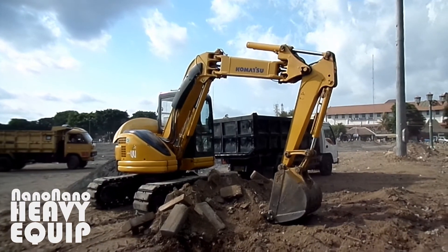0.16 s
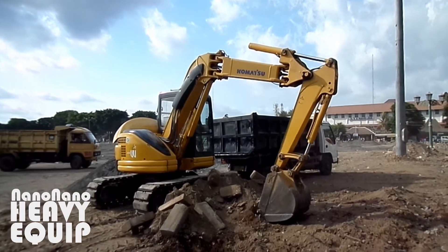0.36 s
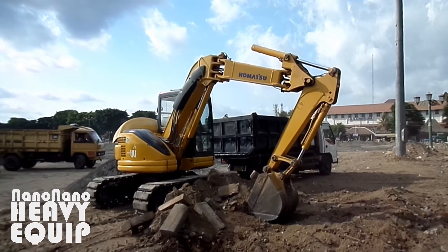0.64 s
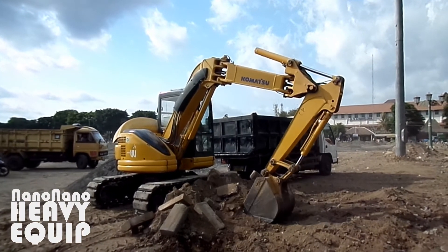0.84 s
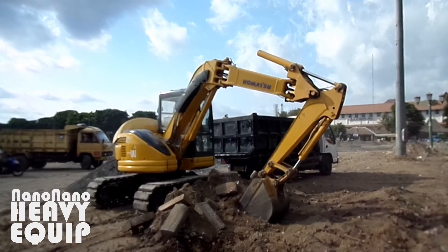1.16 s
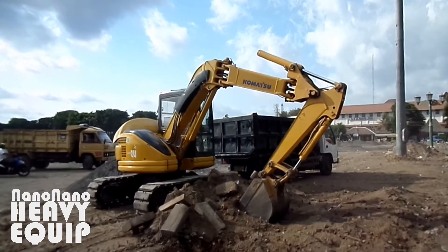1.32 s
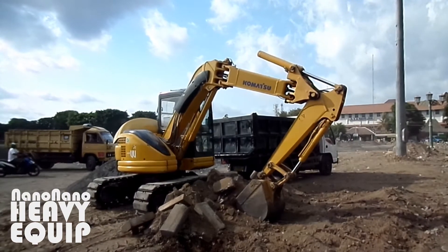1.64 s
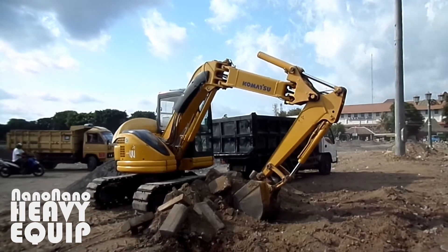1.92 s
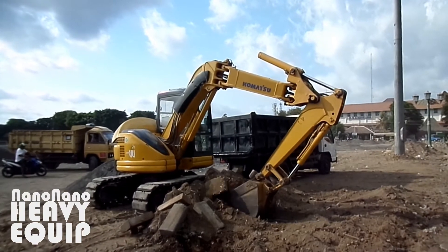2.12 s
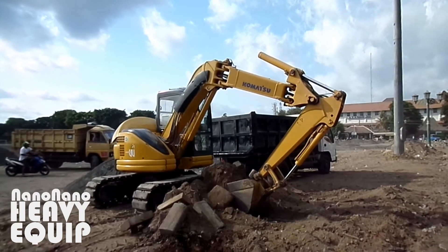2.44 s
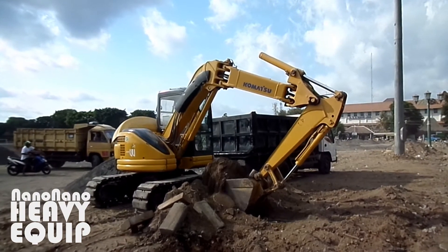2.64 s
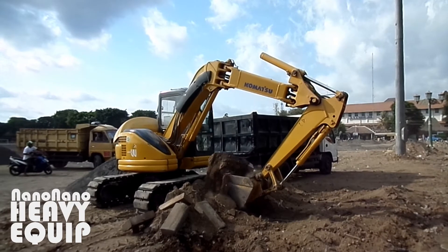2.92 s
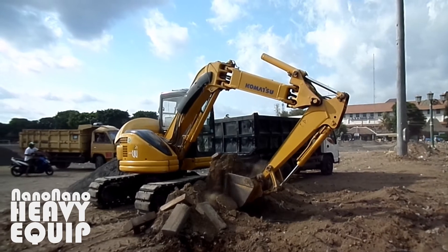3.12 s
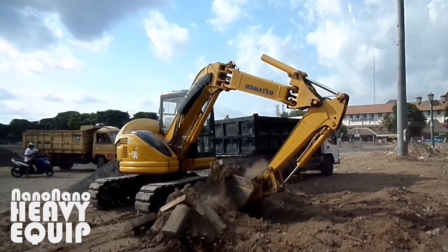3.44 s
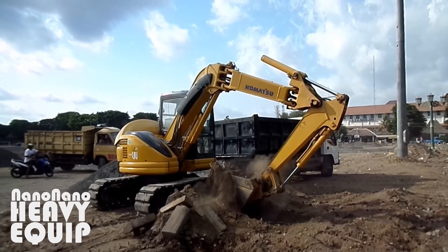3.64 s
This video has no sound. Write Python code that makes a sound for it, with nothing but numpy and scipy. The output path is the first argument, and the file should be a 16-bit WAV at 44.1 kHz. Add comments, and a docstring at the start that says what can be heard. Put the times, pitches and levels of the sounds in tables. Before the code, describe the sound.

Diesel excavator rumbling and whining as it digs through soil and stones in buffeting wind

```python
"""Excavator digging on an open site

A diesel excavator drags its bucket through soil and rubble, all heard at one microphone.
The engine's exhaust and the hydraulic pump are sums of tones tied to one shaft; clatter and oil are noise.
Soil and rubble are showers of clicks and ringing pebbles; stones knock and squeal on the steel bucket.
Wind buffets the microphone with filtered clicks, short low thumps and two sharp overload ticks."""
import sys
import numpy as np
from scipy import signal
from scipy.fft import rfft, irfft
from scipy.io import wavfile

SR = 44100
rng = np.random.default_rng(int(sys.argv[2]) if len(sys.argv) > 2 else 0)


def output_pcm(signal):
    """Save a mono or channel-first signal as 16-bit PCM at the path in sys.argv[1].

    Samples are clipped to [-1, 1] before scaling.
    """
    pcm = np.clip(np.atleast_2d(signal).T, -1, 1) * 32767
    wavfile.write(sys.argv[1], SR, np.round(pcm).astype(np.int16))


N = 166257
T = np.arange(N) / SR


def amp(db):
    """Decibels to gain."""
    return 10 ** (np.asarray(db) / 20)


def unit(x):
    """Scales to rms 1."""
    return x / np.sqrt(np.mean(x ** 2) + 1e-20)


def curve(rows, axis=1):
    """One column of a table, joined by straight lines over time."""
    rows = np.array(rows)
    return np.interp(T, rows[:, 0], rows[:, axis])


def add(mix, start, sound):
    """Mixes a sound in at a time in seconds."""
    part = mix[max(round(start * SR), 0):][:len(sound)]
    part += sound[:len(part)]


def colour(x, points):
    """Filters by a spectrum drawn over log frequency, to rms 1."""
    hz, db = np.transpose(points)
    f = np.fft.rfftfreq(len(x), 1 / SR)
    gain = amp(np.interp(np.log(f + 1), np.log(hz), db))
    return unit(irfft(rfft(x) * gain, len(x)))


def drift(hz):
    """Random wander that fades out above a rate in Hz, rms 1."""
    f = np.fft.rfftfreq(N, 1 / SR)
    lowpass = np.exp(-(f / hz) ** 2) * (f > 0)
    return unit(irfft(rfft(rng.standard_normal(N)) * lowpass, N))


def grains(per_s, spread_db):
    """Random clicks of uneven size and either sign."""
    size = amp(spread_db * np.minimum(rng.exponential(1, N), np.pi))
    return size * rng.choice([-1, 1], N) * (rng.random(N) < per_s / SR)


def swell(start, peak, end):
    """Rises smoothly to a peak and falls away."""
    return np.sin(np.pi / 2 * np.interp(T, [start, peak, end], [0, 1, 0])) ** 2


# Engine speed before its wobble: (time [s], shaft speed [turns/s])
ENGINE_SPEED = [(0, 30.0), (.4, 29.7), (.75, 29.9), (1.1, 30.45), (2.15, 30.68), (2.6, 30.45), (3.0, 30.55),
                (3.3, 30.8), (3.55, 30.55), (3.72, 29.95)]
# Exhaust tones, before the exhaust level: (multiple of firing rate, level [dB])
EXHAUST_TONES = [(1, -48), (2, -38.5), (3, -37.5), (4, -46), (5, -45.5), (6, -49.5), (7, -48)]
# Exhaust level: (time [s], level [dB])
EXHAUST_LEVEL = [(0, 4.5), (.7, -1.5), (1.1, -2.5), (2.2, -1.5), (2.7, -1.5), (3.77, -2)]
# Pump whine: (time [s], first harmonic [dB], second harmonic [dB], third harmonic [dB])
PUMP_WHINE = [(0, -28, -44, -37.5), (.68, -27, -44, -37.5), (.9, -38, -49, -45.5), (1.4, -41.5, -52, -53.5),
              (1.9, -36, -47.5, -42), (2.3, -67, -45.5, -45.5), (2.8, -48, -46.5, -50.5),
              (3.4, -41, -53, -46.5), (3.77, -55, -45, -36.5)]
# High pump tones: (multiple of piston rate, level against the third harmonic [dB])
PUMP_HIGH_TONES = [(7, -17)]
# Spectrum of the engine clatter: (frequency [Hz], relative density [dB per Hz])
CLATTER_SPECTRUM = [(20, -28), (55, -3.5), (130, 1.5), (280, 0), (480, -14), (700, -3), (900, -12),
                    (1050, -13.5), (1880, -14.5), (2250, -21.5), (4000, -30), (8000, -51), (16000, -70)]
# Clatter level: (time [s], level [dB])
CLATTER_LEVEL = [(0, -31), (.7, -30.5), (.9, -35.5), (1.3, -39.5), (1.7, -32.5), (2.05, -34), (2.8, -33.5),
                 (3.3, -29.5), (3.52, -39.5), (3.77, -32)]
CYLINDERS, PISTONS = 4, 9  # engine cylinders, pump pistons
SPEED_WOBBLE, CLATTER_DEPTH = .002, .25  # fractions of speed and of noise amplitude


def machine():
    """One shaft drives exhaust tones, pump whine and noise that swells at each firing."""
    turns = np.cumsum(curve(ENGINE_SPEED) * (1 + SPEED_WOBBLE * drift(33.0))) / SR
    firing = turns * CYLINDERS / 2  # each cylinder fires every second turn
    strokes = PISTONS * turns

    def tone(cycles, db, waver_db):
        """A sine of wavering level; the dB are rms."""
        level = np.sqrt(2) * amp(db + waver_db * drift(15.3))
        return level * np.sin(2 * np.pi * (cycles + rng.random()))

    exhaust = sum(tone(round(k) * firing, db, waver_db=3) for k, db in EXHAUST_TONES)
    pump = sum(tone(k * strokes, curve(PUMP_WHINE, axis=k), waver_db=1.35) for k in (1, 2, 3))
    third = curve(PUMP_WHINE, axis=3)
    pump = pump + sum(tone(k * strokes, third + db, waver_db=6.0) for k, db in PUMP_HIGH_TONES)
    pulsing = 1 + CLATTER_DEPTH * np.cos(2 * np.pi * firing)
    clatter = colour(rng.standard_normal(N) * pulsing, CLATTER_SPECTRUM)
    clatter = clatter * amp(curve(CLATTER_LEVEL) + 1.4 * drift(7))
    return exhaust * amp(curve(EXHAUST_LEVEL)) + pump + clatter


# Spectrum of oil rushing through the valves: (frequency [Hz], relative density [dB per Hz])
OIL_SPECTRUM = [(300, -22), (1500, 6), (3200, 4), (4800, 0), (6500, -3.5), (10000, -3), (13000, -8),
                (16000, -7)]
# Oil hiss level before its flutter: (time [s], level [dB])
OIL_LEVEL = [(0, -41), (.3, -40), (.78, -38.5), (.84, -45), (.96, -48.5), (1.28, -50.5), (1.5, -47.5),
             (2.1, -47), (2.8, -46), (2.88, -42.5), (3.2, -40), (3.38, -46), (3.46, -48)]


def valves():
    """Oil rushing through the valves is filtered noise with a slight flutter."""
    return colour(rng.standard_normal(N), OIL_SPECTRUM) * amp(curve(OIL_LEVEL) + 1.0 * drift(16))


PEBBLE_RING_S, PEBBLE_HITS_PER_S = .003, 22  # decay to 1/e [s], hits at each pitch [1/s]
GRAINS_PER_S, GRAIN_SPREAD_DB = 2400, 2.5  # soil grains [1/s], size spread [dB]


def pebbles(count):
    """Pebbles of many sizes tumble; each rings briefly at its own pitch. Rms 1."""
    t = np.arange(SR // 40) / SR
    pitches = (np.arange(count) + rng.random(count)) * SR / 4 / count
    out = np.zeros(N)
    for hz in pitches:
        ring = np.exp(-t / PEBBLE_RING_S) * np.sin(2 * np.pi * hz * t)
        out += signal.oaconvolve(grains(PEBBLE_HITS_PER_S, GRAIN_SPREAD_DB), ring)[:N]
    return unit(out)


# Spectrum of crumbling soil: (frequency [Hz], relative density [dB per Hz])
SOIL_SPECTRUM = [(200, 9), (700, 13), (1800, 5), (3000, 2.5), (5000, -6.5), (8000, -12), (16000, -71)]
# Crumbling level before the clumps: (time [s], level [dB])
SOIL_LEVEL = [(0, -43.5), (.7, -44), (.718, -24), (.748, -25), (.785, -44), (.86, -53), (1.3, -49.5),
              (1.9, -41), (2.5, -41.5), (2.78, -43), (3.0, -36), (3.08, -36.5), (3.25, -42.5), (3.4, -37),
              (3.5, -47)]
CLUMP_DB, CLUMPS_PER_S = 1.9, 80  # rms level wander [dB], its rate [Hz]


def soil():
    """Soil grains click and pebbles ring, crumbling in uneven clumps."""
    rubble = unit(grains(GRAINS_PER_S, GRAIN_SPREAD_DB)) + pebbles(count=48)
    return colour(rubble, SOIL_SPECTRUM) * amp(curve(SOIL_LEVEL) + CLUMP_DB * drift(CLUMPS_PER_S))


# Wind strength, the rumble level before its flutter: (time [s], level [dB])
WIND_STRENGTH = [(0, -58), (.05, -21.5), (.13, -40), (.6, -63), (.68, -22.5), (.72, -25), (.78, -23),
                 (.81, -29.5), (1.1, -30), (1.35, -32), (1.52, -29), (1.68, -36), (2.02, -26.5),
                 (2.36, -32.5), (2.43, -24.5), (2.52, -34.5), (2.62, -25.5), (2.68, -31.5), (3.06, -33),
                 (3.15, -17.5), (3.22, -34.5), (3.34, -26.5), (3.4, -19.5), (3.44, -21), (3.47, -38),
                 (3.55, -27.5), (3.6, -33.5), (3.72, -39), (3.75, -20)]
# Spectrum of the wind rumble: (frequency [Hz], relative density [dB per Hz])
RUMBLE_SPECTRUM = [(20, -25), (50, -4.5), (140, 1.5), (300, -1.5), (480, -11.5), (750, -21.5), (1300, -49),
                   (16000, -80)]
# Spectrum of the flutter in strong gusts: (frequency [Hz], relative density [dB per Hz])
GUST_SPECTRUM = [(150, 4), (450, 8), (750, 1.5), (1200, -14.5), (2500, -55), (16000, -80)]
# Single wind thumps: (time [s], level [dB], frequency [Hz])
WIND_THUMPS = [(0.045, -11, 142), (0.065, -7, 217), (.702, -4, 398), (0.707, -4, 187), (0.754, -9, 433),
               (0.765, -8.5, 385), (0.776, -10, 340), (0.787, -4, 263), (.839, -11.5, 251),
               (0.877, -6.5, 370), (0.902, -7, 233), (0.963, -8.5, 253), (.998, -8, 352), (1.008, -11, 524),
               (1.026, -9.5, 368), (1.063, -6, 308), (1.067, -6, 517), (1.103, -12, 257), (1.128, -13, 197),
               (1.173, -18.5, 443), (1.205, -7.5, 377), (1.2083, -18.5, 900), (1.274, -15, 256),
               (1.448, -11, 197), (1.636, -10.5, 332), (1.871, -14, 258), (1.89, -13, 238),
               (2.044, -10.5, 443), (2.155, -6, 264), (2.216, -12.5, 205), (2.275, -16, 428),
               (2.283, -7.5, 340), (2.311, -12.5, 597), (2.563, -10.5, 164), (2.613, -10, 403),
               (2.96, -11, 149), (3.134, -12, 120), (3.144, -5.5, 273), (3.17, -4.5, 320), (3.199, -7, 300),
               (3.212, -6.5, 275), (3.245, -7, 175), (3.299, -11.5, 199), (3.32, -8, 222),
               (3.358, -4.5, 282), (3.392, 0, 350), (3.402, -8, 328), (3.413, -9, 278), (3.425, -8, 463),
               (3.44, -7, 390), (3.458, -7.5, 323), (3.505, -13, 367), (3.631, -12.5, 342), (3.73, -7, 326),
               (3.747, -7.5, 242), (3.759, -11, 378)]
EDDIES_PER_S, EDDY_SPREAD_DB, WIND_FLUTTER_DB = 450, 2.5, 1.5
GUST_DB, GUST_GROWTH = -23, 1.72  # level at the strongest wind [dB], growth [dB per dB of wind]
THUMP_RISE, THUMP_FALL, THUMP_EDGE = 0.21, 0.36, 0.29  # slopes and rounding of the top [cycles]


def wind():
    """Small eddies rumble on the microphone, brighter in strong gusts; large ones give pressure thumps."""
    strength = curve(WIND_STRENGTH)
    rumble = colour(grains(EDDIES_PER_S, EDDY_SPREAD_DB), RUMBLE_SPECTRUM)
    rumble = rumble * amp(strength + WIND_FLUTTER_DB * drift(33))
    gust_level = amp(GUST_DB + GUST_GROWTH * (strength - strength.max()))
    out = rumble + colour(grains(900, spread_db=1.0), GUST_SPECTRUM) * gust_level
    t = np.arange(-SR // 40, SR // 40) / SR
    for time, db, hz in WIND_THUMPS:
        slope = np.where(t < 0, THUMP_RISE, THUMP_FALL)
        shape = np.exp((THUMP_EDGE - np.hypot(t * hz, THUMP_EDGE)) / slope)
        add(out, time + t[0], amp(db) * shape * np.cos(2 * np.pi * (hz * t + rng.random())))
    return out


# The teeth bite into the rubble: (start [s], peak [s], end [s], level [dB])
TOOTH_BITES = [(0.663, 0.763, 0.81, -17), (3.375, 3.43, 3.475, -20.5)]
# Spectrum of the grinding: (frequency [Hz], relative density [dB per Hz])
BITE_SPECTRUM = [(60, -33), (200, 6.5), (550, 4), (1000, -10), (2500, -39), (8000, -70)]


def bites():
    """The teeth grind into rubble: dense clicks, filtered low, that swell and fall."""
    grinding = colour(grains(1400, spread_db=0.5), BITE_SPECTRUM)
    return grinding * sum(amp(db) * swell(start, peak, end) for start, peak, end, db in TOOTH_BITES)


# Stones strike the bucket: (time [s], crunch level [dB], ring level [dB])
STONE_KNOCKS = [(.7435, -24.5, -45), (1.36, -38, -61), (1.4563, -36.5, -53), (1.525, -41, -39),
                (1.652, -38.5, -51), (1.994, -46, -32), (2.1448, -29, -18.5), (2.245, -36, -32),
                (2.51, -35, -34), (2.615, -33, -37), (3.063, -29.5, -60), (3.1176, -30, -54),
                (3.2373, -35, -54)]
# Bucket modes, before the ring level and a small pitch scatter: (frequency [Hz], level [dB], t60 [s])
BUCKET_MODES = [(232.7, 8, 0.12), (574, -7, 0.069), (788, 8.5, 0.031), (1430, -1.5, 0.056),
                (1760, -10, 0.07), (1670, -15, 0.14), (3930, -22, 0.13)]
# Spectrum of a stone's crunch: (frequency [Hz], relative density [dB per Hz])
CRUNCH_SPECTRUM = [(400, -11), (1500, 2), (4200, 2), (7000, -6.5), (15000, -19)]
CRUNCH_S, KNOCK_RISE_S, MODE_SCATTER = 0.011, 0.0028, 0.013  # decay [s], onset [s], pitch fraction


def stones():
    """Each stone crunches and briefly rings the soil-damped bucket."""
    out, t = np.zeros(N), np.arange(SR // 4) / SR
    for time, crunch_db, ring_db in STONE_KNOCKS:
        crunch = colour(grains(5000, spread_db=0.5)[:len(t)], CRUNCH_SPECTRUM) * np.exp(-t / CRUNCH_S)
        ring = np.zeros(len(t))
        for hz, mode_db, t60 in BUCKET_MODES:
            pitch = hz * (1 + MODE_SCATTER * rng.standard_normal())
            ring += amp(mode_db - 60 * t / t60) * np.sin(2 * np.pi * (pitch * t + rng.random()))
        knock = amp(crunch_db) * crunch + amp(ring_db) * ring
        add(out, time, knock * np.minimum(t / KNOCK_RISE_S, 1))
    return out


# Microphone overload ticks: (time [s], level [dB])
OVERLOAD_TICKS = [(.786, -14), (3.4115, -14)]
TICK_S = .0002  # decay to 1/e


def ticks():
    """Microphone overload ticks in strong wind thumps: one sharp step of pressure each, gone at once."""
    out, t = np.zeros(N), np.arange(SR // 20) / SR
    for time, db in OVERLOAD_TICKS:
        add(out, time, amp(db) * np.exp(-t / TICK_S))
    return out


# Dry steel squeaks: (time [s], pitch ratio, level [dB])
STEEL_SQUEAKS = [(0.798, 0.863, -39), (.849, 0.88, -44), (0.867, 1.02, -36), (.881, 1.007, -30.5),
                 (.898, 1.004, -31)]
# Steel resonances, before the pitch ratio: (frequency [Hz], width [Hz], level [dB])
STEEL_MODES = [(2600, 340, -3), (4860, 220, 0.5), (5870, 250, -6), (7600, 240, -6), (9040, 310, -6),
               (10320, 370, -3.5), (13520, 380, 0)]
SQUEAK_S, SQUEAK_SAG_PER_S = .004, 1.1  # time to the peak [s], pitch fraction lost [1/s]


def squeaks():
    """A tooth skids on stone in short slips; each excites high steel resonances that sag and die away."""
    out, t = np.zeros(N), np.arange(SR // 16) / SR
    f, age = np.fft.rfftfreq(len(t), 1 / SR), t / SQUEAK_S
    shape = sum(amp(db) / (1 + (2 * (f - hz) / width) ** 2) for hz, width, db in STEEL_MODES)
    shape = shape + amp(-16) * (f > 1500)  # a floor of hiss between the resonances
    fine_t = np.arange(10 * len(t)) / (10 * SR)
    for time, pitch, db in STEEL_SQUEAKS:
        # ten times oversampled, so that it can be read at a gliding speed
        steel = irfft(rfft(rng.standard_normal(len(t))) * shape, len(fine_t))
        glide = pitch * (t - SQUEAK_SAG_PER_S * t ** 2 / 2)
        add(out, time, amp(db) * age * np.exp(1 - age) * unit(np.interp(glide, fine_t, steel)))
    return out


# Stone squeals on steel: (time [s], frequency [Hz], level [dB])
STONE_CHIRPS = [(1.047, 3000, -40), (2.256, 1420, -30), (2.33, 1420, -35), (2.422, 1410, -30),
                (2.517, 1640, -32)]
CHIRP_S, CHIRP_ROUGH = .008, .075  # half-width to 1/e [s], rms pitch fraction


def chirps():
    """Stone slips on steel with a short squeal, rough from fast random pitch changes."""
    out = np.zeros(N)
    for time, hz, db in STONE_CHIRPS:
        pitch = hz * (1 + CHIRP_ROUGH * drift(312))
        envelope = amp(db) * np.exp(-((T - time) / CHIRP_S) ** 2)
        out += envelope * np.sin(2 * np.pi * np.cumsum(pitch) / SR)
    return out


# The bucket judders on stone: (start [s], peak [s], end [s], pitch at full strain [Hz], level [dB])
BUCKET_JUDDERS = [(1.731, 1.778, 1.78, 288, -20.5), (1.791, 1.825, 1.87, 301.5, -15),
                  (2.253, 2.272, 2.295, 273.3, -15.5), (2.57, 2.627, 2.62, 126.5, -18)]
JUDDER_BEND, JUDDER_ROUGH = .09, .06  # pitch fractions: bend by strain, rms roughness


def judders():
    """The bucket judders on stone as a rough tone, rising in pitch as it strains."""
    out = np.zeros(N)
    for start, peak, end, hz, db in BUCKET_JUDDERS:
        strain = swell(start, peak, end)
        pitch = hz * (1 + JUDDER_BEND * (strain - 1) + JUDDER_ROUGH * drift(122))
        out += strain * amp(db + 0.96 * drift(100)) * np.sin(2 * np.pi * np.cumsum(pitch) / SR)
    return out


def scene():
    """The site and the wind, summed at one microphone."""
    site = machine() + valves() + soil()
    microphone = wind() + ticks()
    bucket = bites() + stones() + squeaks() + chirps() + judders()
    return (site + microphone + bucket)[None]


CUTOFF_HZ = 15950


def record(dry):
    """Clips at full scale, then limits the band with a steep low-pass."""
    lowpass = signal.firwin(511, CUTOFF_HZ, window=("kaiser", 9), fs=SR)
    return signal.oaconvolve(np.clip(dry, -1, 1), lowpass[None], "same")


dry = scene()
out = record(dry)
output_pcm(out)
```